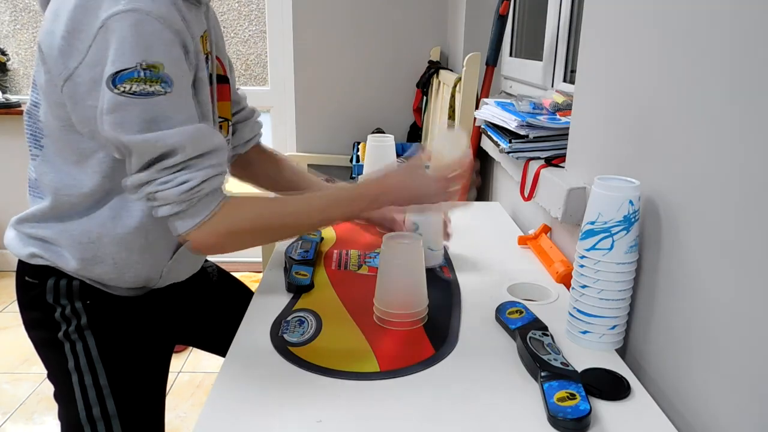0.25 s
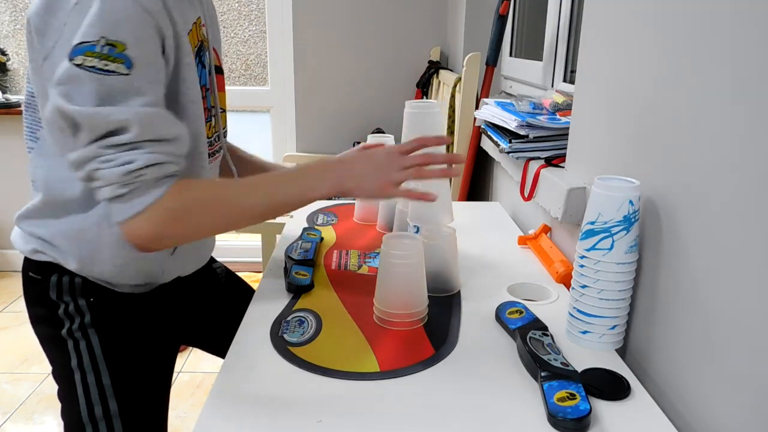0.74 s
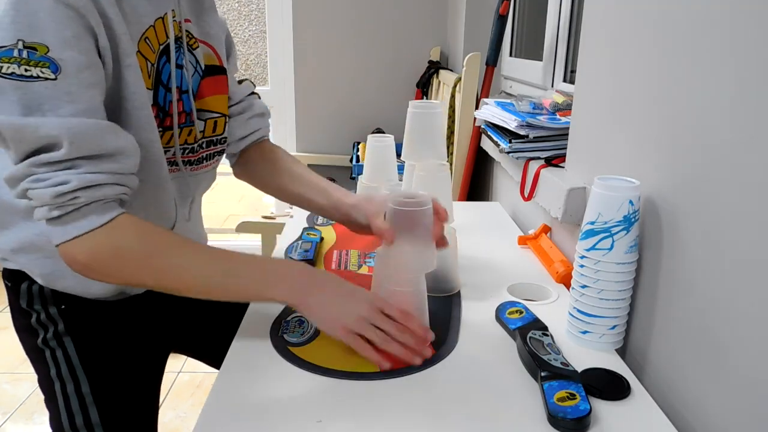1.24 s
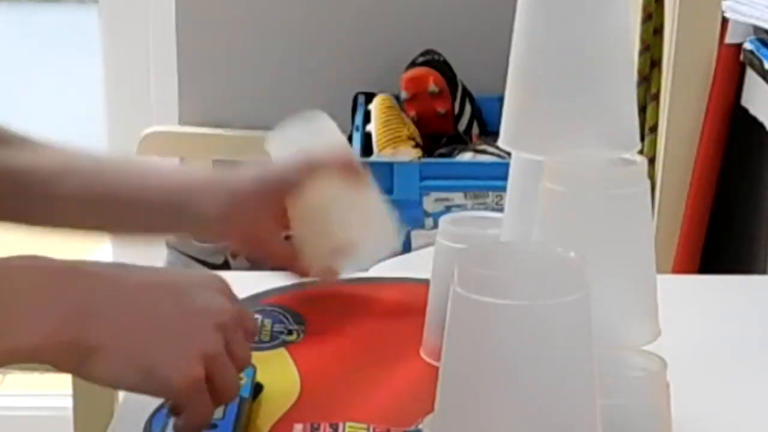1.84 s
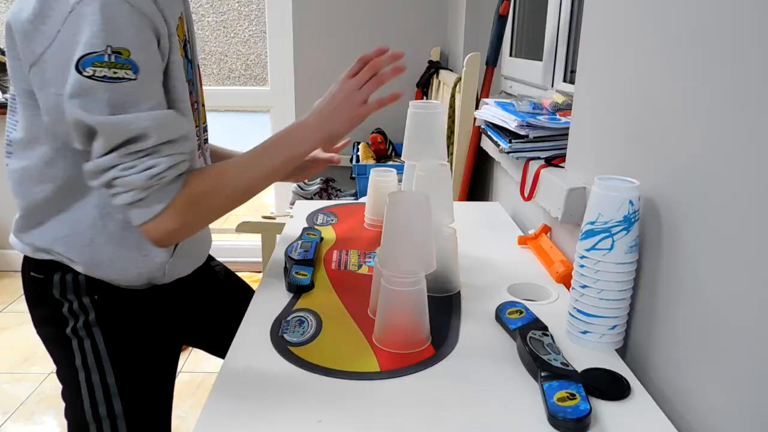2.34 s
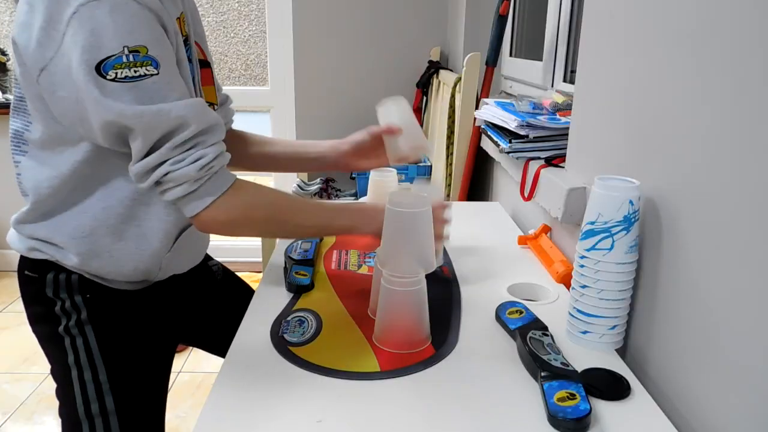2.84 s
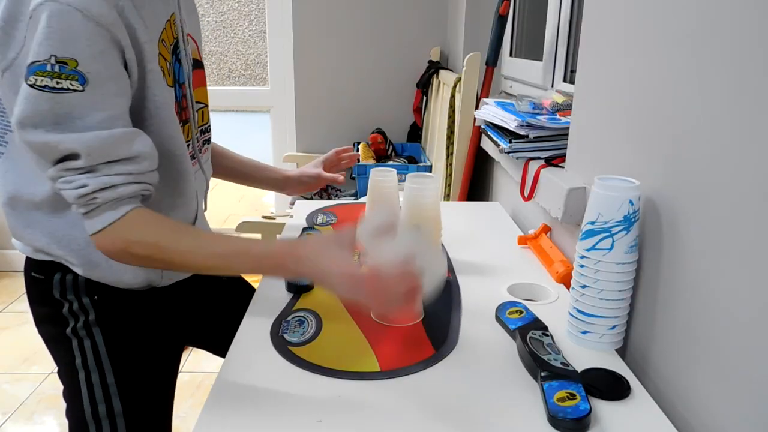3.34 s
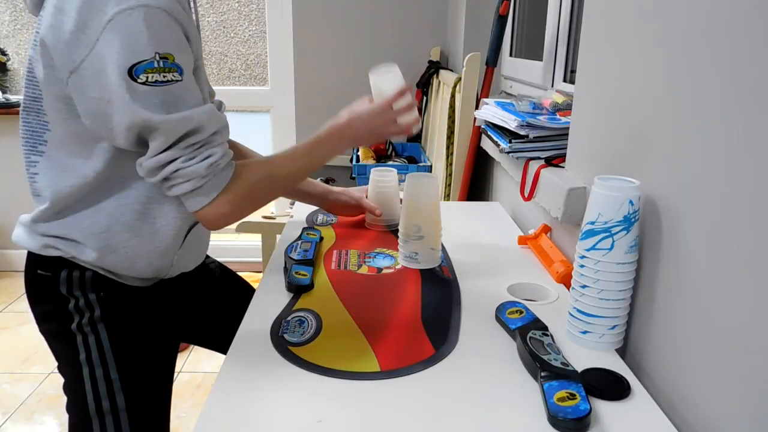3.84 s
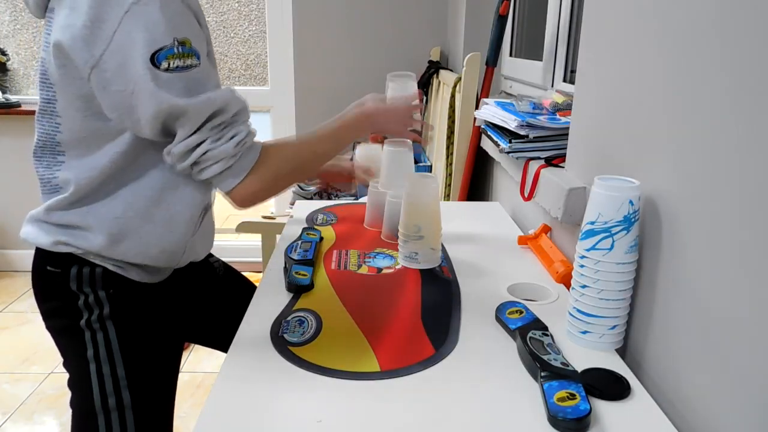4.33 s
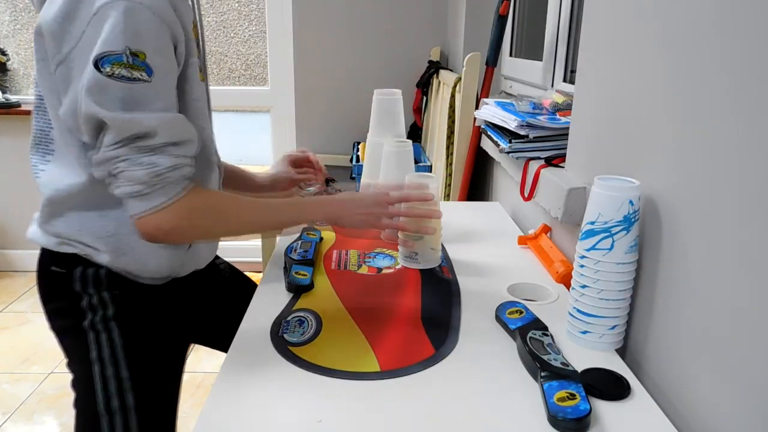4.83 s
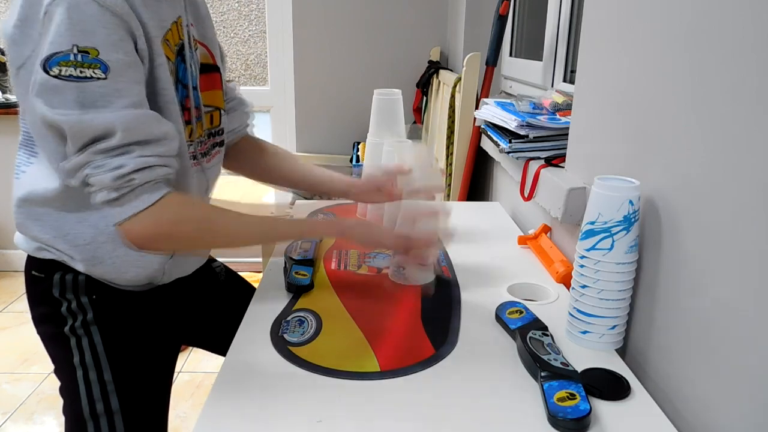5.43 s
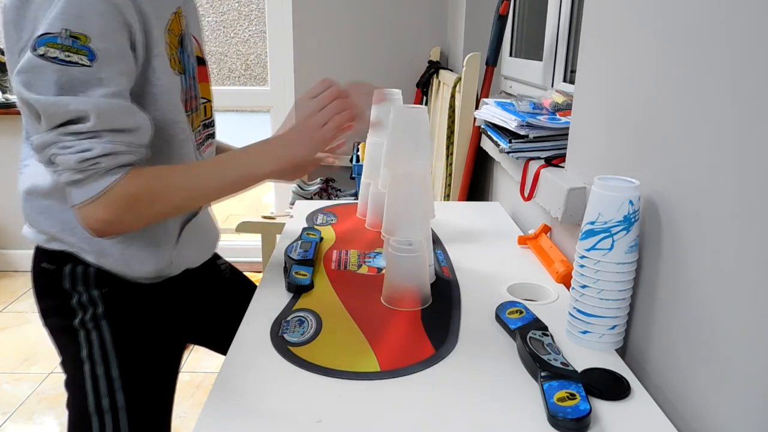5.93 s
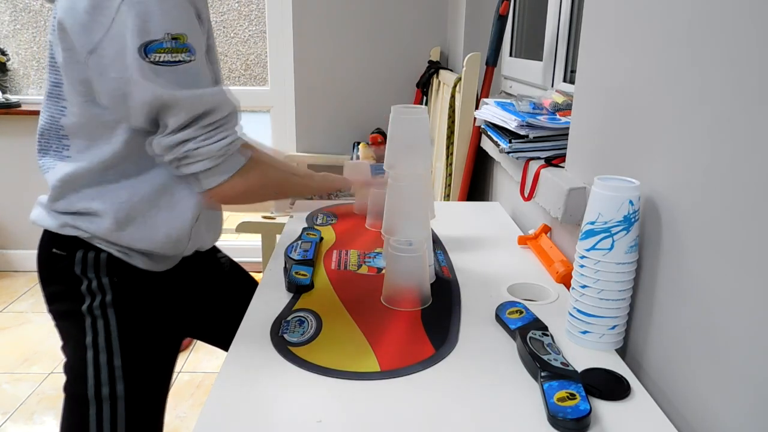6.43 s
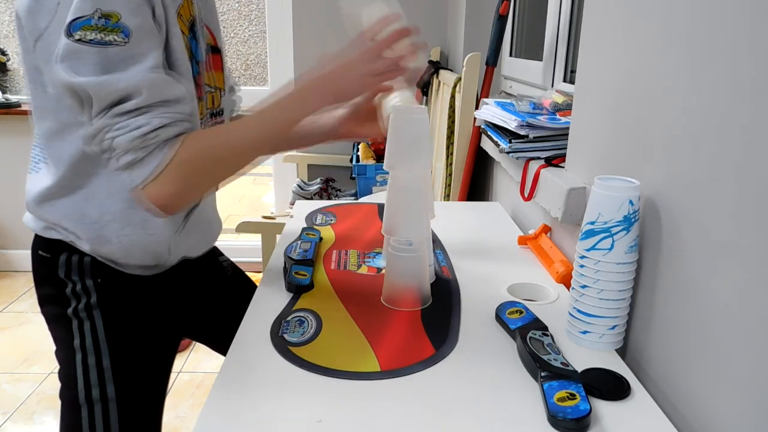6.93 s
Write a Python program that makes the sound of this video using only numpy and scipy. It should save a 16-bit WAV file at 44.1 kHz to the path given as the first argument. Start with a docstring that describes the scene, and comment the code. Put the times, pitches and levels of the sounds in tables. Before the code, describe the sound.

Light plastic cups clack, thud and rattle in rapid uneven bursts on a matted table in a small, hard, echoing room.

```python
"""Fast cup stacking

Plastic cups are stacked up and swept down at speed on a table mat in a small, hard-walled room.
Each blow mixes a thud of the table, a hollow knock of the cup and a crack of its rim, all shaped clicks.
Nesting cups rattle and scrape (tiny catches over hiss), cups rock, the table hums and a brush hisses softly.
Echoes, standing waves and a dense tail ring after every blow; gain control and overload squash the loudest."""
import sys
import numpy as np
from scipy import signal
from scipy.fft import rfft, irfft
from scipy.io import wavfile
from scipy.ndimage import uniform_filter1d

SR = 44100
rng = np.random.default_rng(int(sys.argv[2]) if len(sys.argv) > 2 else 0)


def pcm_store(signal):
    """Save signal as 16-bit PCM."""
    levels = np.round(np.clip(np.atleast_2d(signal), -1, 1) * 32767)
    wavfile.write(sys.argv[1], SR, levels.astype(np.int16).T)


N = 316197
LEAD_S = .3  # the sound is built from this long before time zero
SIZE = N + round(LEAD_S * SR)

# Cups land. Each row: time in seconds, table thud in dB, cup knock in dB, pitch of the hollow in Hz,
# freedom to ring from 0 to 1, rim crack in dB, and dB by which the blow faces the microphone.
LANDINGS = [(-.2, -19, -19, 1250, 0.35, -32, -5), (.243, -60, -42, 1800, 0.3, -55, 3),
            (.4125, -16, -20.5, 1630, 0.05, -32, 3.5), (.5, -17, -28, 1290, 0.16, -29, 2),
            (.567, -43, -25.5, 1740, 0.5, -31, 3.5), (.662, -23.5, -34, 1310, 0.05, -45, -6),
            (.689, -23.5, -18, 1150, 0.3, -27.5, 0), (1.093, -50.5, -37, 1545, 0.64, -54, 1.5),
            (1.254, -19, -15, 910, 0.43, -35.5, 1), (1.283, -17, -13.5, 1140, 0.32, -26, 2),
            (1.762, -44, -35.5, 1187, 0.9, -65, -4), (1.819, -29, -53, 1230, 0.2, -27.5, 3),
            (1.845, -22.5, -19, 1220, 0.3, -29, -4), (1.858, -17.5, -14, 1270, 0, -21, -1),
            (2.029, -10.5, -15, 1310, 0, -12, -1), (2.079, -6.5, -15, 1203, 1, -19.5, 0),
            (2.619, -37, -32, 1270, .3, -48, -4), (2.643, -32, -28, 1340, 0.6, -36, 2),
            (2.71, -10, -8, 1590, 0, -20, -3.5), (2.911, -17, -7, 1698, 0.65, -22, 0.5),
            (2.977, -20.5, -17, 1450, 0.57, -25, 0.5), (3.273, -30.5, -43, 1280, 0.23, -48.5, 2.5),
            (3.291, -51, -24.5, 1347, .1, -25, 3), (3.32, -23.5, -17.5, 1450, 0, -29, 6),
            (3.335, -20.5, -22.5, 1150, .1, -26, 3.5), (3.503, -23.5, -21, 1655, 0.67, -28, 0),
            (3.545, -28.5, -25.5, 1647, 0.45, -64, -9), (3.943, -53, -46.5, 1495, 0.5, -70, 3),
            (4.094, -19.5, -31, 1600, 0.24, -44, -2), (4.162, -48, -40, 1240, 0, -34, 1),
            (4.169, -21, -24.5, 1120, 0.1, -23.5, 1), (4.279, -20.5, -24, 1530, 0.41, -34, 1),
            (4.457, -22, -52, 1260, .1, -47, -1), (4.464, -35, -35.5, 1370, 0.3, -34, -1.5),
            (4.603, -24, -25, 1290, 0.4, -37, 3), (4.615, -16, -12.5, 1307, 0.42, -25, 3.5),
            (5.403, -67, -47, 1690, 0.57, -65, 7.5), (5.5145, -8.5, -17, 1000, 0.02, -35, 4),
            (5.635, -23, -34, 1250, 0, -26, 1.5), (5.702, -25.5, -24, 1400, 0.33, -47.5, 3),
            (5.793, -22, -23.5, 1230, 0.23, -38, -0.5), (5.834, -15.5, -12, 1257, 0.5, -24, 3.5),
            (6.374, -56, -40.5, 1150, 0.6, -61, -1), (6.424, -31, -29, 1290, 0.67, -52, 2.5),
            (6.497, -36, -22, 1330, 0, -17.5, -5), (6.682, -38, -20.5, 1728, 0.77, -28, -6),
            (7.038, -19, -21.5, 1320, 0.26, -38.5, 1.5), (7.091, -35, -37, 1230, 0.5, -46, 4),
            (7.114, -36, -17.5, 1450, 0.3, -26.5, 5.5)]
BLOW_S = .005  # the levels of a landing are averages (rms) over this time
# Colour of the rim's crack. Each row: frequency in Hz, relative level in dB per Hz.
RIM_COLOUR = [(100, -29.5), (500, 3), (2000, 3.5), (2750, -2.5), (3300, 2.5), (4100, 0), (5500, -2.5),
              (8000, -4.5), (11000, -9), (14000, -14.5), (16000, -26.5)]
# The thin wall of a cup, rung by every crack. Each row: typical frequency in Hz,
# level in dB against the crack, time to fall by 60 dB in seconds.
WALL_NOTES = [(2140, -18, .03), (3146, -14, .018), (3920, -15, 0.0067), (5200, -17.5, .01)]
WALL_SPREAD = 0.042  # share by which the wall's notes typically differ from contact to contact
THUD_HZ, FIRM_DB = 538, -28.5  # pitch of a firm thud, and the level from which a thud is firm
THUD_OCTAVES_PER_DB = 0.05  # softer contacts are duller
# the table top flexes under a heavy blow, adding a deeper note that grows faster than the thud
FLEX_HZ, FLEX_Q, FLEX_DB, FLEX_DB_PER_DB = 363, 1.66, -22.5, .65
MAT_HZ = 1500  # the soft mat keeps treble above this out of the thud
KNOCK_OVER_HOLLOW = 1.073  # the broad knock is centred just above the hollow's note
HELD_Q, FREE_Q = 0.95, 2.51  # the knock narrows as the fingers let go
HOLLOW_T60_S = 0.055  # time in which the hollow's note falls by 60 dB
ROCKING_Q = 3.3  # sharpness of the hollow of a rocking cup
# Diffuse tail of the room. Each row: frequency in Hz, dB over the direct sound before the slow build-up.
TAIL_LEVELS = [(70, 22.5), (130, 16), (175, 6), (230, 12.5), (310, 5), (380, 7), (490, -0.5), (640, 5),
               (810, 7), (1170, 5), (1450, 2.5), (2300, 5), (3500, 9), (13000, 6.5)]
# How long the tail lasts. Each row: frequency in Hz, time to fall by 60 dB in seconds.
TAIL_TIMES = [(150, 0.34), (640, 0.49), (1190, 0.64), (1800, 0.76), (4200, 0.7), (8000, 0.55),
              (13000, 0.35)]
# Standing waves of the room. Each row: frequency in Hz, starting level in dB against the direct sound,
# time to fall by 60 dB in seconds.
STANDING_WAVES = [(117.1, -39, 0.45), (141.2, -38.5, 0.46), (195.6, -44.5, 0.45), (264.2, -46.5, 0.42),
                  (358.6, -53.5, 0.51), (507.5, -55, 0.52), (565.6, -63, 0.73), (754, -55.5, 0.29),
                  (1135, -58.5, 0.65), (1209, -55.5, 0.7)]
# Echoes of wall and ceiling. Each row: delay in seconds, level in dB.
WALL_ECHOES = [(.0088, -18.5), (.0148, -34), (0.024, -20), (.0295, -32)]
# Colour of the quiet room. Each row: frequency in Hz, relative level in dB per Hz.
HUSH_COLOUR = [(20, -9), (50, 2), (66, -19), (85, 4.5), (130, -5), (300, -5), (1000, -4), (3000, -13),
               (8000, -20.5), (16000, -25)]
HUSH_DB = -61.5  # level of the quiet room, rms
# Soft, deep bumps of the table. Each row: time in seconds, level in dB.
TABLE_BUMPS = [(.087, -49), (1.051, -61), (2.082, -39), (2.719, -22), (2.958, -22), (3.31, -41),
               (3.51, -40), (5.081, -48), (5.251, -51), (6.539, -35), (6.688, -38), (7.04, -37.5)]
# Low notes of the table. Each row: frequency in Hz, level in dB against the bump,
# time to fall by 60 dB in seconds.
TABLE_NOTES = [(97.6, -6, 0.31), (118.6, -0.5, 0.37), (143.7, -6.5, 0.33), (190, -2.5, .25)]
# Cups slide over each other and the mat. Each row: start in seconds, end in seconds, thud in dB,
# knock in dB, pitch of the hollow in Hz, freedom to ring from 0 to 1, scrape in dB.
CUP_SLIDES = [(0.314, 0.387, -46.5, -69, 1200, .2, -76), (0.559, .78, -37, -35.5, 1100, 0.2, -43),
              (0.688, 0.796, -32.5, -27, 1125, 0.56, -50), (1.021, 1.215, -55.5, -58, 1350, 0.6, -54.5),
              (1.766, 1.82, -40, -41.5, 1170, 0.33, -48.5), (1.805, 1.93, -31, -32, 1260, 0.03, -37),
              (2.033, 2.116, -21.5, -14.5, 1170, 0.02, -33), (2.63, 2.747, -33, -31, 1460, 0.3, -31),
              (2.7, 2.78, -14, -18, 1410, 0.1, -58), (2.911, 3.018, -28.5, -24, 1600, 0.35, -39),
              (3.296, 3.38, -54, -25, 1212, 0, -51), (3.942, 4.037, -56.5, -67, 1260, 0.2, -87),
              (5.241, 5.314, -63, -57.5, 1440, 0.24, -57.5), (5.393, 5.49, -60, -71, 1210, .1, -67),
              (6.393, 6.438, -35, -44, 1160, 0.2, -61), (6.405, 6.527, -44, -35, 1320, 0.36, -37.5),
              (6.477, 6.593, -26.5, -25.5, 1720, 0.36, -43), (7.061, 7.175, -53, -45, 1200, 0.26, -37.5)]
# Sleeves and fingers brush past the cups. Each row: start in seconds, end in seconds, level in dB.
CLOTH_BRUSHES = [(1.042, 1.065, -59), (1.106, 1.145, -47), (1.185, 1.253, -47), (5.095, 5.14, -64),
                 (5.408, 5.45, -61)]
# A cup is knocked while held in the air. Each row: time in seconds, level in dB.
KNOCKS_IN_AIR = [(6.682, -26.5)]
# What a held cup rings with. Each row: frequency in Hz, level in dB against the knock,
# time to fall by 60 dB in seconds.
HELD_CUP_NOTES = [(400.5, -3.5, 0.15), (821, 0.5, 0.18), (875, 1, 0.16), (894, -3, .15), (1800, -3, 0.069)]
# The whole sound dips for an instant. Each row: middle in seconds, half width in seconds, depth in dB.
LEVEL_DIPS = [(2.376, 0.0031, -16)]
TREBLE_EDGE_HZ = 16300  # nothing much is heard above this


def amp(db):
    """Turns decibels into a factor for the wave."""
    return 10 ** (np.asarray(db) / 20)


def evened(x):
    """Scales to an average (rms) level of 1."""
    return x / np.sqrt(np.mean(x ** 2) + 1e-20)


def unit(x):
    """Scales to a total energy of 1."""
    return x / (np.linalg.norm(x) + 1e-20)


def read(points, hz):
    """Reads between the rows of a table, with frequency spaced as the ear hears it."""
    f, value = np.transpose(points)
    return np.interp(np.log(hz + 1), np.log(f + 1), value)


def add(mix, s, sound):
    """Mixes a sound in at time s; the track begins LEAD_S early."""
    start = max(round((s + LEAD_S) * SR), 0)
    part = mix[start:][:len(sound)]
    part += sound[:len(part)]


def mode(hz, t60):
    """One second of a sine that falls by 60 dB in t60 seconds."""
    t = np.arange(SR) / SR
    return np.sin(2 * np.pi * hz * t) * np.exp(-np.log(1000) * t / t60)


def dying(hz, t60, rise_cycles=0.82, size=4096):
    """A short note of a cup that swells within about a cycle, at energy 1."""
    t = np.arange(size) / SR
    swell = 1 - np.exp(-(t * hz / rise_cycles) ** 2)
    return unit(mode(hz, t60)[:size] * swell)


def band(hz, q, size=4096):
    """Spectrum of a strongly damped resonance with steep skirts, at energy 1."""
    f = np.fft.rfftfreq(size, 1 / SR) + 1
    return unit(1 / (1 + (q * (f / hz - hz / f)) ** 2))


def causal(gain):
    """The sharpest click with this spectrum that makes no sound before its start, at energy 1."""
    cepstrum = irfft(np.log(np.maximum(gain, 1e-5)))
    half = len(cepstrum) // 2
    # folding the second half onto the first moves all sound after the start
    cepstrum[1:half] *= 2
    cepstrum[half + 1:] = 0
    return unit(irfft(np.exp(rfft(cepstrum))))


def rim(size=4096, uneven_db=.7):
    """Click of the thin plastic wall and its brief ring; every point of contact colours it a little."""
    f = np.fft.rfftfreq(size, 1 / SR)
    smooth = uniform_filter1d(rng.standard_normal(len(f)), size=48)
    ripple = evened(uniform_filter1d(smooth, size=32))
    wall = np.zeros(size)
    for hz, db, t60 in WALL_NOTES:
        pitch_hz = hz * (1 + WALL_SPREAD * rng.standard_normal())
        wall += amp(db) * rng.choice([-1, 1]) * dying(pitch_hz, t60)
    click = causal(amp(read(RIM_COLOUR, f) + uneven_db * ripple))
    return unit(click + wall)


def body(thud_db, knock_db, hollow_hz, free, thud_q=1.07, board_hz=735, board_q=2.04, board_db=-5.0):
    """Table and cup answer a contact together; the table top has one clear note, a free cup's hollow rings."""
    free = np.clip(free, 0, .95)
    over_firm_db = thud_db - FIRM_DB
    thud_hz = THUD_HZ * 2 ** (THUD_OCTAVES_PER_DB * min(over_firm_db, 0))
    board = amp(board_db) * band(board_hz, board_q)
    flex = amp(FLEX_DB + FLEX_DB_PER_DB * over_firm_db) * band(FLEX_HZ, FLEX_Q)
    # hypot adds energies
    thud = np.hypot(np.hypot(band(thud_hz, thud_q), board), flex)
    f = np.linspace(0, SR / 2, len(thud))
    thud = thud / np.hypot(1, (f / MAT_HZ) ** 2)
    # what the free hollow takes, the broad knock loses
    knock_q = HELD_Q + free * (FREE_Q - HELD_Q)
    knock = np.sqrt(1 - free ** 2) * band(hollow_hz * KNOCK_OVER_HOLLOW, knock_q)
    gain = np.hypot(amp(thud_db) * unit(thud), amp(knock_db) * knock)
    click = np.linalg.norm(gain) * causal(gain / gain.max())
    hollow = amp(knock_db) * free * dying(hollow_hz, HOLLOW_T60_S)
    return click + hollow


def chatter(length_s):
    """A rim never lands all at once: a swell of tiny touches, at energy 1."""
    u = np.arange(SR // 80) / SR / length_s
    return unit(rng.standard_normal(len(u)) * u * np.exp(-u))


def blows(near_thud_db=0.5, near_knock_db=-1.5, near_crack_db=0.4, lead_s=.0035, lead_db=-23):
    """Cups land: one sound goes straight to the microphone (near), one is thrown into the room (far)."""
    near, far = np.zeros((2, SIZE))
    settle_s, chatter_s = .0011, .0014  # spread of the touches of body and rim
    for s, thud_db, knock_db, hollow_hz, free, crack_db, facing_db in LANDINGS:
        crack = amp(crack_db) * rim()
        near_body = body(thud_db + near_thud_db, knock_db + near_knock_db, hollow_hz, free)
        near_crack = amp(near_crack_db) * crack
        for click, length_s in (near_body, settle_s), (near_crack, chatter_s):
            touches = unit(np.convolve(click, chatter(length_s)))
            direct = np.linalg.norm(click) * touches
            add(near, s, amp(facing_db) * direct)
            # a faint copy of the blow comes just before it and softens its start
            add(near, s - lead_s, amp(lead_db) * direct)
        # over all directions the touches merge into one
        add(far, s, body(thud_db, knock_db, hollow_hz, free) + crack)
    return np.sqrt(BLOW_S * SR) * np.array([near, far])


def wobbles(fade_s=0.029, level_db=-3):
    """A cup left free rocks on its rim after a blow: a dying patter of touches keeps its hollow sounding."""
    out, t = np.zeros(SIZE), np.arange(SR // 4) / SR
    for s, _, knock_db, hollow_hz, free, _, _ in LANDINGS:
        patter = rng.standard_normal(len(t)) * np.sqrt(t) * np.exp(-t / fade_s)
        rocking = unit(signal.fftconvolve(patter, causal(band(hollow_hz, ROCKING_Q))))
        add(out, s, amp(knock_db) * free ** 2 * rocking)
    return amp(level_db) * np.sqrt(BLOW_S * SR) * out


def tail(build_s=0.0062):
    """Dense reflections build up, then each band dies at its own speed."""
    hz, t, noise = signal.stft(rng.standard_normal(SR), SR, nperseg=1024)
    t60 = read(TAIL_TIMES, hz)[:, None]
    decay = np.exp(-np.log(1000) * t / t60)
    decay = decay * np.sqrt(2 * np.log(1000) / (t60 * SR))  # long and short decays carry equal energy
    colour = amp(read(TAIL_LEVELS, hz))[:, None]
    wash = signal.istft(noise * decay * colour, SR)[1][:SR]
    build = 1 - np.exp(-(np.arange(SR) / SR / build_s) ** 2)
    return wash * build


def room(near, far, turn_s=.6, count=4):
    """Echoes and standing waves stay put; the diffuse tail slowly fades between a few random versions."""
    standing = sum(amp(db) * mode(hz, t60) for hz, db, t60 in STANDING_WAVES)
    out = near + signal.fftconvolve(far, standing)[:SIZE]
    for delay, db in WALL_ECHOES:
        add(out, delay - LEAD_S, amp(db) * near)
    # the versions take turns on a fixed clock, once round in turn_s
    place = np.arange(SIZE) / SR / turn_s * count
    for k in range(count):
        share = np.sin(np.pi / 2 * np.minimum((place - k) % count, 2))
        out += signal.fftconvolve(far * share, tail())[:SIZE]
    return out


def hush():
    """Steady faint noise of the house: random noise given the colour of the quiet room."""
    hz = np.fft.rfftfreq(SIZE, 1 / SR)
    spectrum = rfft(rng.standard_normal(SIZE)) * amp(read(HUSH_COLOUR, hz))
    return amp(HUSH_DB) * evened(irfft(spectrum, SIZE))


def bumps(rise_s=0.0074):
    """The table is nudged and hums low: a few dying sines swell up softly together."""
    out, t = np.zeros(SIZE), np.arange(SR) / SR
    notes = sum(amp(db) * mode(hz, t60) for hz, db, t60 in TABLE_NOTES)
    hum = notes * (1 - np.exp(-t / rise_s))
    for s, db in TABLE_BUMPS:
        add(out, s, amp(db) * hum)
    return out


def slides(spread_db=1.5, rub=0.013, catch_db=-34, puff_hz=80, puff_db=-29, far_db=-5):
    """Cups slip into each other: a swell of tiny uneven catches over smooth rubbing (near and far)."""
    slips_per_s = 330
    out = np.zeros(SIZE)
    for start, end, *shape, scrape_db in CUP_SLIDES:
        chance, strength, hiss = rng.random(SR), rng.exponential(1, SR), rng.standard_normal(SR)
        slip_size = amp(spread_db * np.minimum(strength, 2)) * np.sign(hiss)
        slips = (chance < slips_per_s / SR) * slip_size
        swell = signal.windows.cosine(round(np.clip(end - start, .01, 1) * SR))
        grip = min(amp(scrape_db - catch_db), 1)  # a light touch glides with weaker catches
        force = evened((grip * slips + rub * hiss)[:len(swell)]) * swell
        puff = amp(puff_db) * causal(band(puff_hz, 0.77))  # air squeezed out from between the cups
        contact = body(*shape) + amp(scrape_db) * (rim() + puff)
        add(out, start, signal.fftconvolve(force, contact))
    return np.array([out, amp(far_db) * out])


def brushes(hiss_hz=10000, hiss_q=0.39, grain_db=4.0):
    """A light brush of cloth or skin is a short swell of fine, high, grainy hiss."""
    out, colour = np.zeros(SIZE), causal(band(hiss_hz, hiss_q))
    for start, end, db in CLOTH_BRUSHES:
        swell = signal.windows.cosine(round(np.clip(end - start, .01, 1) * SR))
        slow_noise = evened(uniform_filter1d(rng.standard_normal(SR), size=90))
        grains = amp(grain_db * slow_noise)
        hiss = evened(grains * rng.standard_normal(SR))
        add(out, start, amp(db) * signal.fftconvolve(hiss[:len(swell)] * swell, colour))
    return out


def held_cup(rise_cycles=1.0):
    """Clear of the mat, a knocked cup rings much longer: dying sines that swell within about a cycle."""
    out, t = np.zeros(SIZE), np.arange(SR) / SR
    ring = np.zeros(SR)
    for hz, db, t60 in HELD_CUP_NOTES:
        swell = 1 - np.exp(-(t * hz / rise_cycles) ** 2)
        ring += amp(db) * mode(hz, t60) * swell
    for s, db in KNOCKS_IN_AIR:
        add(out, s, amp(db) * ring)
    return out


def scene():
    """Cups in the room; the first blow falls just before time zero, so its ringing opens the sound."""
    near, far = blows() + slides() + wobbles() + held_cup()
    sound = room(near, far) + brushes() + bumps() + hush()
    return sound[None, -N:]


def record(dry, attack_s=0.017, threshold_db=-29.0, squeeze=0.54, release_db_per_s=90, ceiling=0.34):
    """Gain control holds loud passages down, peaks clip, the level dips briefly, the top treble is cut."""
    t = np.arange(N) / SR
    keep = np.exp(-1 / (attack_s * SR))
    power = signal.lfilter([1 - keep], [1, -keep], dry[0] ** 2)
    power_db = 10 * np.log10(power + 1e-12)
    # the control follows rises, then lets go at a steady speed
    fall_db = t * release_db_per_s
    held_db = np.maximum.accumulate(power_db + fall_db) - fall_db
    over_db = np.maximum(held_db - threshold_db, 0)
    # it lags, so the first peaks of a blow get through and clip
    clipped = np.clip(dry * amp(-squeeze * over_db), -ceiling, ceiling)
    dip_db = sum(db * np.exp(-((t - s) / width) ** 2) for s, width, db in LEVEL_DIPS)
    low_pass = signal.firwin(511, TREBLE_EDGE_HZ, window=("kaiser", 9), fs=SR)
    return signal.oaconvolve(clipped * amp(dip_db), low_pass[None], "same")


dry = scene()
out = record(dry)
pcm_store(out)
```